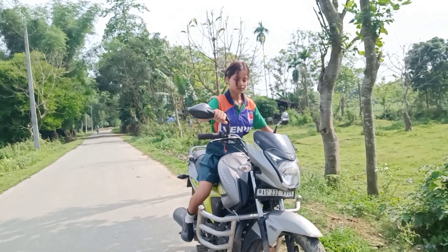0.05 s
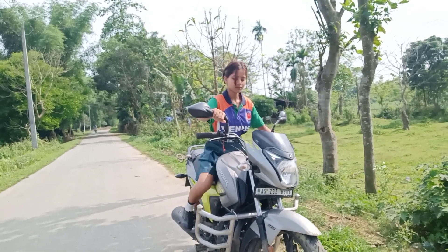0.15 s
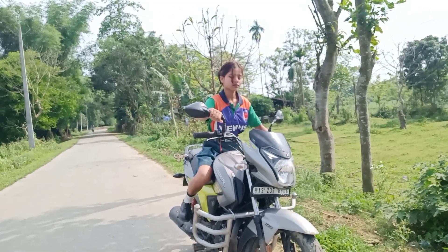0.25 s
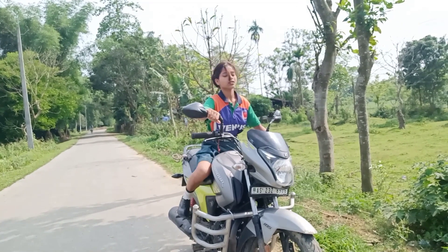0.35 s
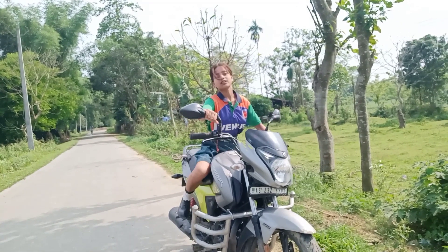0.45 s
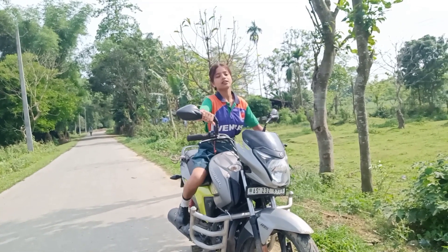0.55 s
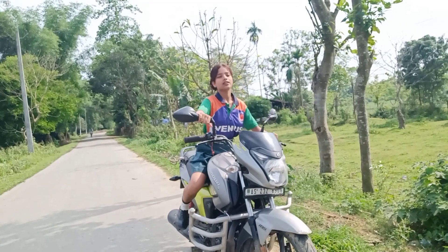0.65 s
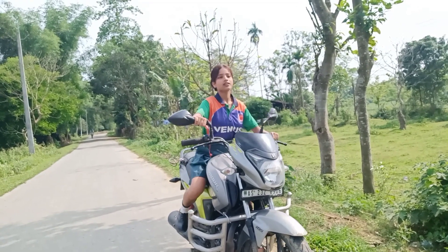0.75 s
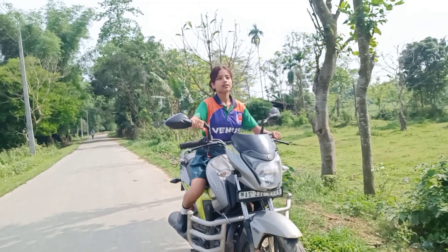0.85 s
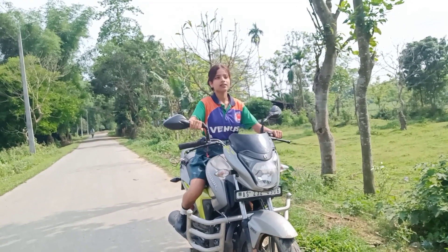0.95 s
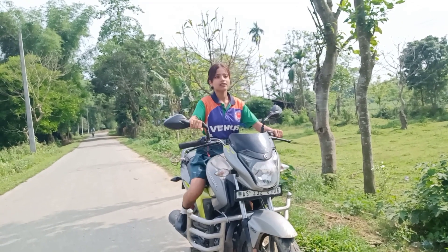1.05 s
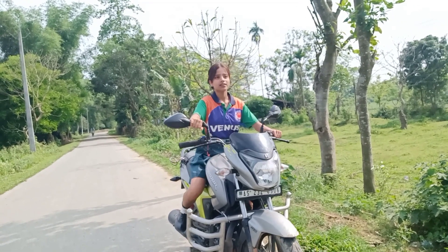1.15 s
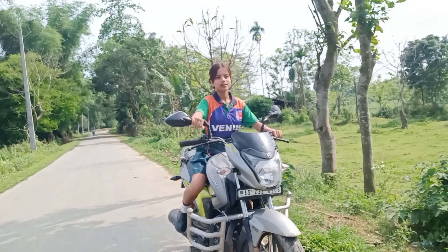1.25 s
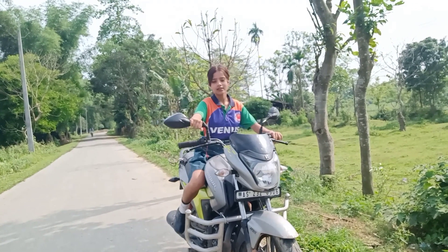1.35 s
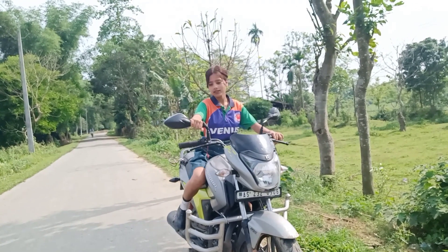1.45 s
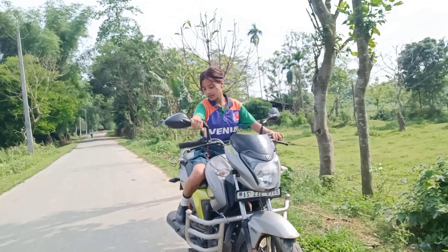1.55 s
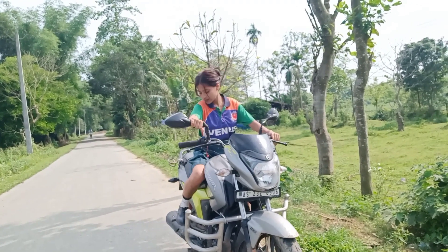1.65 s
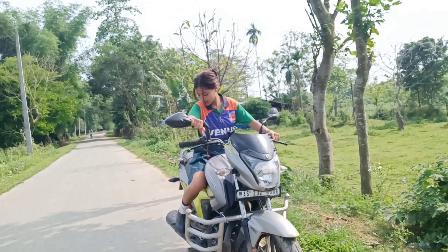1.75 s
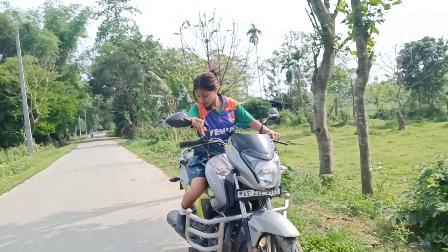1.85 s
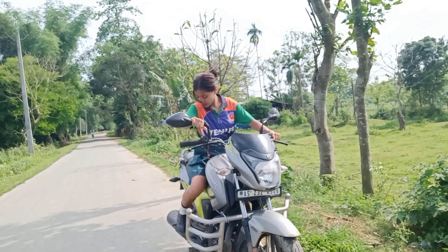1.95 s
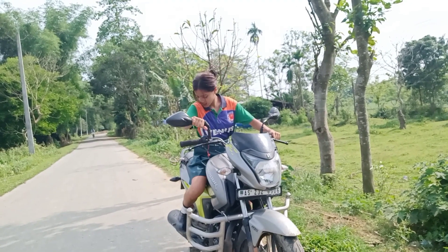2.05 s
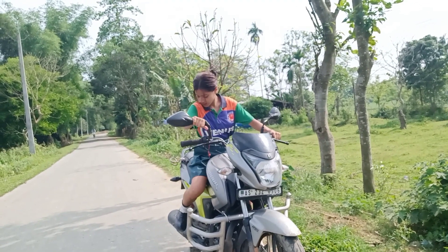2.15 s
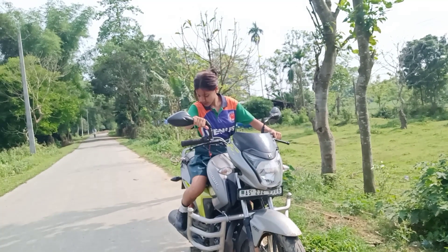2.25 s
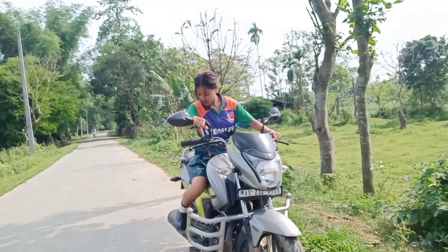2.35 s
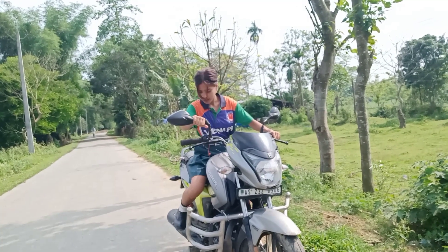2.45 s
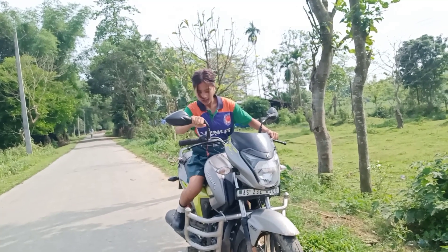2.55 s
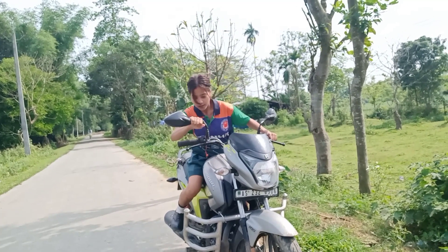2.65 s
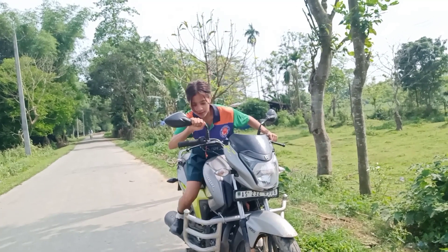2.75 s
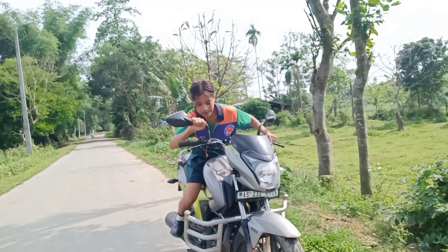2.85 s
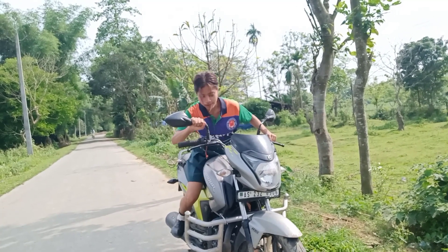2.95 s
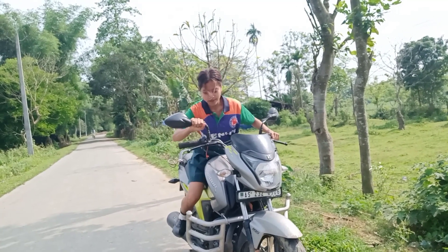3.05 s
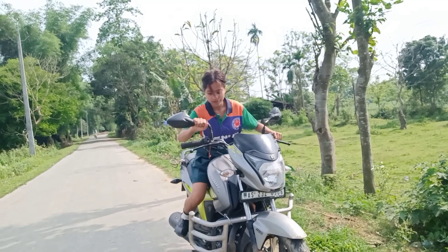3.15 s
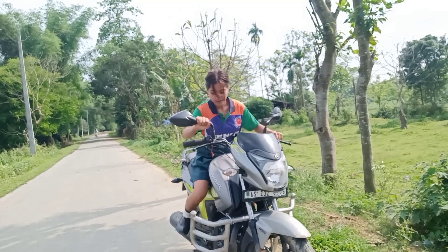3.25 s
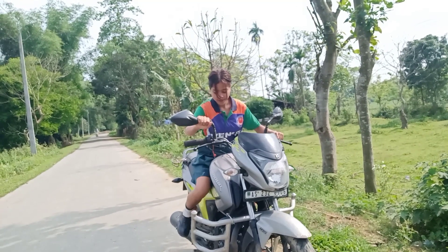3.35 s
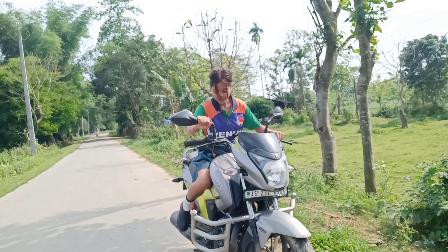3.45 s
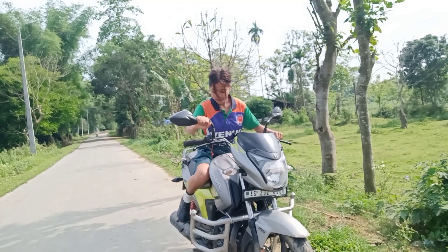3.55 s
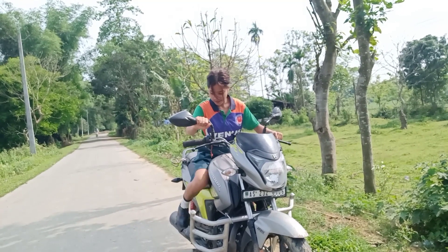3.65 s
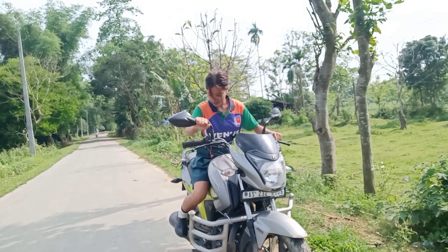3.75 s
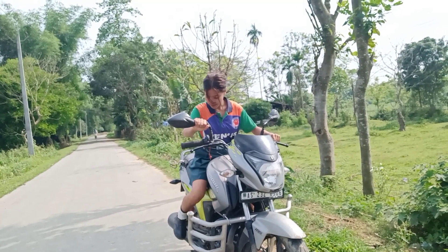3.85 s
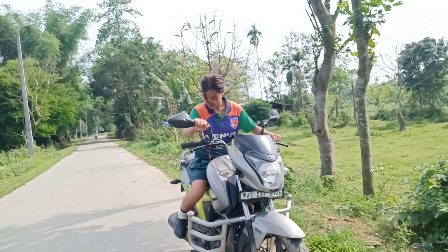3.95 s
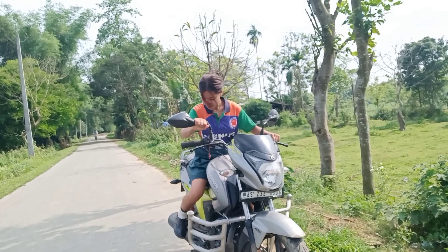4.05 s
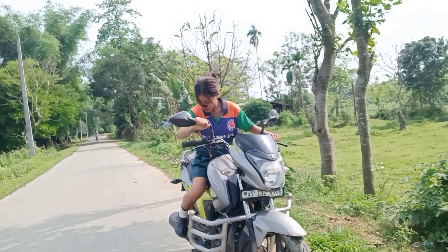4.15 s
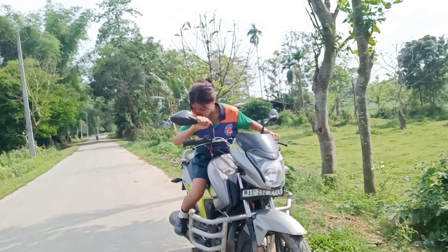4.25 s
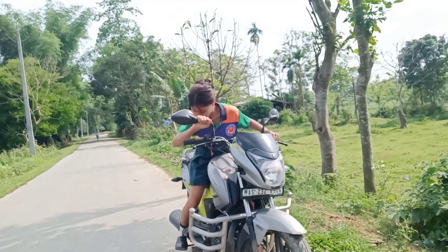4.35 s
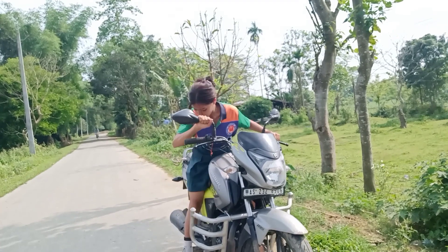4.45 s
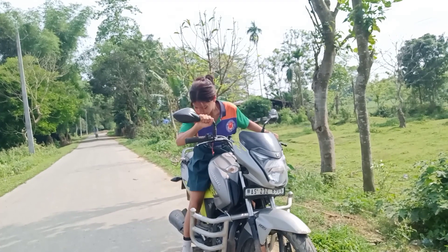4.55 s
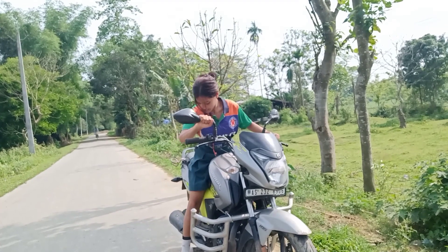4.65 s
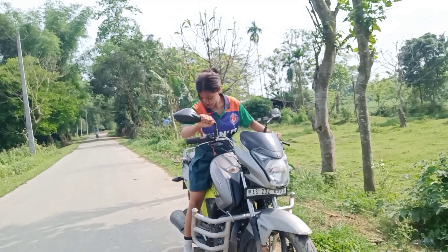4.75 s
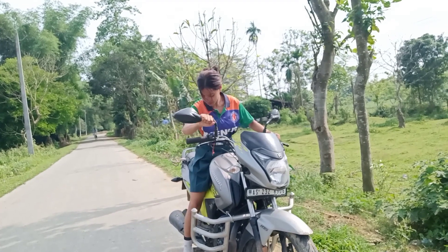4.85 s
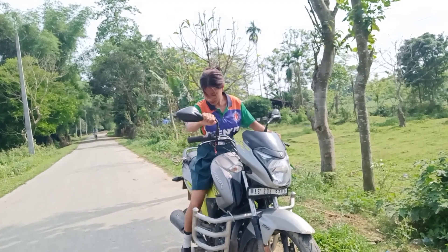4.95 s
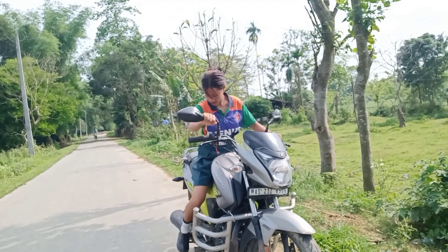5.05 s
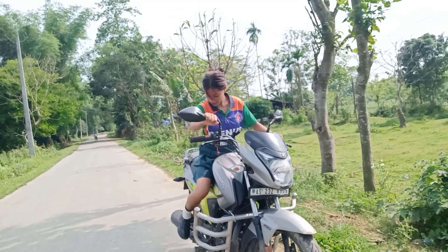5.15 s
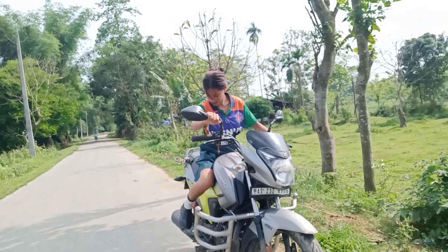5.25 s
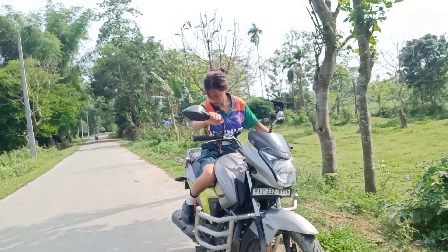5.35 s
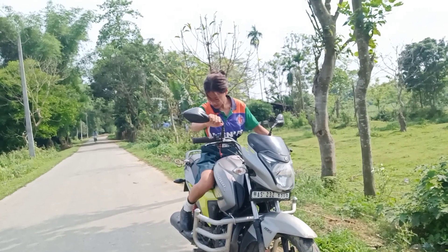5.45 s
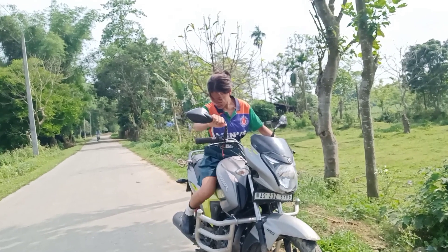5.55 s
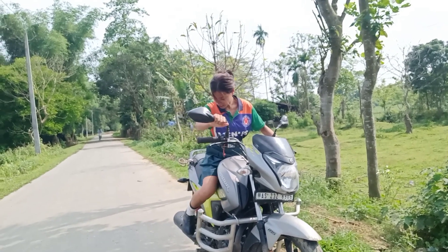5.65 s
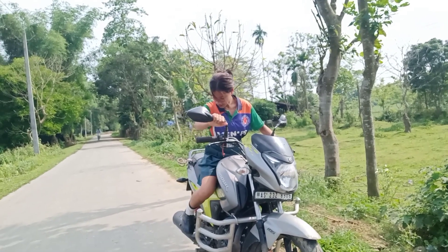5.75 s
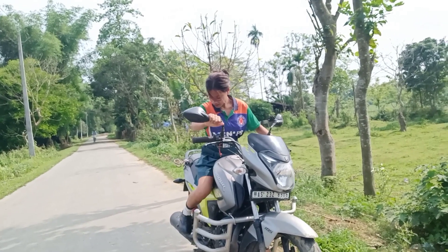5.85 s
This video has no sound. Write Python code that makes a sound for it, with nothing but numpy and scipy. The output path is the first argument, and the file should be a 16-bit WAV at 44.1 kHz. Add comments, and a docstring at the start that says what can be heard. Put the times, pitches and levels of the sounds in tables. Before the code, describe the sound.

On a quiet country road a motorcycle kick lever clicks and knocks, then one full kick rattles the gears without firing, amid cicadas and a whistling bird.

```python
"""On a country road a motorcycle's kick lever is nudged: ratchet teeth snap, a shoe scuffs, links knock.
In the first four seconds a bird repeats a falling whistle, another answers faintly; then gears groan.
Then one full kick: gears rattle, teeth snap in a row and the crank coasts in soft puffs, without firing.
Cicadas pulse throughout over a drone that grows near the end. Strikes, rattles and insects are shaped
noise; the lever's ring, the groan and the whistles are sines. Two microphones on a phone listen."""
import sys
import numpy as np
from scipy import signal
from scipy.fft import rfft, irfft, next_fast_len
from scipy.io import wavfile
from scipy.ndimage import uniform_filter1d

SR = 44100
rng = np.random.default_rng(int(sys.argv[2]) if len(sys.argv) > 2 else 0)


def bounce(signal):
    """Save signal as a 16-bit WAV file at the path given by the first command-line argument."""
    frames = np.transpose(np.atleast_2d(signal))
    limited = np.clip(frames, -1, 1)
    pcm = np.round(limited * 32767).astype(np.int16)
    wavfile.write(sys.argv[1], SR, pcm)


N = 259749
T = np.arange(N) / SR  # time of every sample [s]

# crankcase resonances: (pitch [Hz], width before sharpening [Hz], strength before scaling [dB])
CASE = [(1110, 60, -11), (1280, 24, 2), (1480, 79, -28), (1790, 28, -30), (2207, 18, -13), (2557, 40, -27),
        (2800, 69, -5), (2970, 118, -5.5), (3070, 8.1, 6), (3219, 51, -28), (3400, 48, -16), (3790, 70, 4)]
# pushes that turn the gears, the loudest being the full kick:
# (start [s], rise [s], length [s], level before friction [dB])
PUSHES = [(2.787, 0.054, 0.097, -48.5), (2.934, 0.12, 0.19, -52), (3.213, 0.1, 0.18, -56),
          (3.68, 0.039, 0.11, -57), (3.846, 0.022, 0.06, -55), (4.298, 0.13, 0.43, -34),
          (4.808, 0.14, 0.54, -47), (5.52, 0.055, 0.09, -49.5)]
# a clear tone goes only into the row that reaches both microphones: (share of the tone [0-1])
SHARED = np.array([[1], [0]])


def undb(db):
    """Turn decibels into gain."""
    return 10 ** (np.asarray(db) / 20)


def unit(x):
    """Scale to an average (rms) strength of 1."""
    return x / np.sqrt(np.mean(x ** 2))


def along(points, hz):
    """Read (Hz, value) points along a logarithmic pitch axis."""
    f, value = np.transpose(points)
    return np.interp(np.log(hz + 1), np.log(f), value)


def curve(rows, column=1):
    """Join the points of a table column by straight lines, at every sample."""
    rows = np.array(rows)
    return np.interp(T, rows[:, 0], rows[:, column])


def gesture(rows, fade=0.035):
    """Gain of a (time [s], level [dB]) curve that fades out beyond its ends."""
    first, last = rows[0][0], rows[-1][0]
    ends = np.interp(T, [first - fade, first, last, last + fade], [0, 1, 1, 0])
    return undb(curve(rows)) * ends


def colour(x, db_of):
    """Filter to the gain db_of(Hz) with no sound ahead of its cause (minimum phase)."""
    size = next_fast_len(x.shape[-1] + 4096, True) // 2 * 2
    hz = np.arange(size // 2 + 1) * SR / size
    cepstrum = irfft(np.log(undb(db_of(hz))))
    # folding the second half onto the first puts the response after its cause
    cepstrum[1:size // 2] *= 2
    cepstrum[size // 2 + 1:] = 0
    return irfft(rfft(x, size) * np.exp(rfft(cepstrum)))[..., :x.shape[-1]]


def resonances(modes, hz, lift_db, sharpen):
    """Gain in dB where a body rings along; a higher sharpen makes the peaks narrower."""
    peaks = 0
    for f, width, db in modes:
        peaks = peaks + undb(db / 4) / (1 + (2 * sharpen * (hz - f) / width) ** 2)
    return lift_db * peaks


def walk(rate):
    """Random wander with a spread near 1, taking a new value `rate` times a second."""
    count = int(N / SR * rate) + 2
    points = rng.standard_normal(count)
    return np.sqrt(3 / 2) * np.interp(T * rate, np.arange(count), points)


def hiss(spectrum):
    """Two separate rows of coloured noise."""
    return unit(colour(rng.standard_normal((2, N)), lambda hz: along(spectrum, hz)))


def grains(rate, scatter_db):
    """Dense tiny impacts of uneven size, at random moments."""
    hits = (rng.random(N) < rate / SR) * undb(scatter_db * rng.standard_normal(N))
    return hits * rng.standard_normal((2, N))


def add(out, sound, s):
    """Mix a sound in at time s [s], cutting what falls outside."""
    start = int(s * SR)
    first, last = max(start, 0), min(start + sound.shape[-1], N)
    out[:, first:last] += sound[:, first - start:last - start]


def blow(body, db_of, slide_db, slide_s, rise_s, crack_s, ring_db, ring_t60, repeat):
    """Metal slides, then strikes: a crack and a dense ring, partly the same each time."""
    t = (np.arange(body.shape[1]) - body.shape[1] // 10) / SR  # the strike is a tenth of the way in
    after = np.maximum(t, 0)
    decay = np.exp(-after / crack_s) + undb(ring_db - 60 * after / ring_t60)
    strike = np.clip(t / rise_s, 0, 1) * decay
    slide = undb(slide_db) * (t > -slide_s) * (t < rise_s)
    repeat = np.clip(repeat, 0, 1)
    ring = np.sqrt(repeat) * body + np.sqrt(1 - repeat) * rng.standard_normal(body.shape)
    sound = colour(ring * (strike + slide), db_of)
    return sound / np.sqrt(np.sum(sound ** 2) / (SR / 100))  # the same energy for every blow


def strokes(rows, drag_db_per_s, release_s):
    """Strokes that gather speed, are slowed by friction and die away after their length."""
    gain = np.zeros(N)
    for s, rise_s, length_s, db in rows:
        t = T - s
        attack = np.clip(t / rise_s, 0, 1) ** 2
        release = np.exp(-np.maximum(t - length_s, 0) / release_s)
        gain += attack * release * undb(db - drag_db_per_s * np.maximum(t - rise_s, 0))
    return gain


def ratchet(body):
    """Each tooth rides up its ramp and snaps down, ringing the crankcase."""
    # teeth snapping over: (time [s], level [dB], treble [dB], bass [dB])
    teeth = [(0.1221, -23, -6, -4.5), (0.2136, -22, -11, -2), (0.3327, -26, -8, 2.5),
             (4.5107, -25, -3.5, 7), (4.553, -24.5, -5.5, 1.5), (4.5968, -23, -1.5, 5),
             (4.649, -24.5, -2.5, 0), (4.704, -21, -3, -2), (4.878, -27.5, -2.5, 3),
             (5.0273, -24.5, -3, 2.5), (5.1021, -24, -2.5, 0), (5.1686, -24, -2, 0), (5.24, -24, -4, 1.5),
             (5.327, -24.5, -2, 0)]
    # broad colour of a snap: (pitch [Hz], level [dB])
    snap_colour = [(100, -39), (280, -22), (430, -5.5), (900, -14.5), (1400, -4.5), (2200, 3), (3100, -1.5),
                   (4200, -2), (5200, -0.5), (6200, 6), (7000, -6), (8200, -21), (10000, -25), (15000, -27)]
    out = np.zeros((2, N))
    for s, db, treble_db, bass_db in teeth:
        tilt = [(800, bass_db), (1700, 0), (3200, 0), (5000, treble_db)]

        def tone(hz):
            return along(snap_colour, hz) + along(tilt, hz) + resonances(CASE, hz, lift_db=7.5, sharpen=1)

        snap = blow(body, tone, slide_db=-16.5, slide_s=0.0075, rise_s=0.0021, crack_s=0.006,
                    ring_db=-11.5, ring_t60=0.18, repeat=0.31)
        add(out, snap * undb(db), s - body.shape[1] / 10 / SR)
    return out


def gears():
    """Gear teeth and chain rattle the gearbox in uneven bursts while the lever drives the crank."""
    # broad colour of the churning: (pitch [Hz], level [dB])
    churn_colour = [(60, -18), (140, -7), (330, -11), (420, -6), (560, 0.5), (850, 2), (1150, 1.5),
                    (1650, -6), (2400, -2), (3200, -12), (4500, -15), (7000, -30), (10000, -37.5)]
    # gearbox resonances: (pitch [Hz], width before sharpening [Hz], strength before scaling [dB])
    gearbox = [(239.5, 75, 8.5), (434, 170, 29.5), (438, 48, -34), (678, 40, 13), (797.6, 26, 22.5),
               (781, 11, -5), (1004, 24, -2), (1250, 47, -36), (1290, 14, 9), (1460, 20, -28),
               (1824, 17, 45), (2250, 49, 20)]
    rattle = unit(grains(rate=2000, scatter_db=1.5)) + 1.12 * rng.standard_normal((2, N))
    bursts = undb(2.6 * walk(110))

    def tone(hz):
        return along(churn_colour, hz) + resonances(gearbox, hz, lift_db=6.0, sharpen=2.03)

    churn = unit(colour(rattle * bursts, tone))
    return churn * strokes(PUSHES, drag_db_per_s=33, release_s=0.063)


def puffs(width_s=0.03):
    """Soft low puffs: one for every turn of the coasting crank, and a few more at uneven times."""
    # colour of a puff: (pitch [Hz], level [dB])
    puff_colour = [(25, -17), (45, -17), (68, 0), (100, -1), (135, -11.5), (200, -15.5), (400, -52.5)]
    # further low puffs of air: (time [s], level [dB])
    further_puffs = [(1.93, -65), (3.32, -59.5), (3.722, -58), (4.261, -61.5), (4.868, -52), (5.61, -58)]
    spin_start_s, turn_s, turn_count = 4.457, 0.0812, 12
    turn_slowing = 0.0081  # each turn takes longer by this share of the first
    first_puff_db, hold_s, fade_db_per_s = -52, 0.39, 19  # puffs fade once the crank has lost its swing
    turn = np.arange(turn_count)
    since = turn_s * turn * (1 + turn_slowing * turn / 2)
    levels = first_puff_db - fade_db_per_s * np.maximum(since - hold_s, 0)
    gain = np.zeros(N)
    for s, db in [*zip(spin_start_s + since, levels), *further_puffs]:
        gain += undb(db) * np.exp(-((T - s) / width_s) ** 2)
    return hiss(puff_colour) * gain


def whine():
    """Slowly meshing gears groan on one unsteady note, their teeth smearing it."""
    # the groan as the engine is eased over: (time [s], pitch [Hz], level [dB])
    groan = [(2.87, 468, -72), (2.9, 482, -56), (2.96, 508, -70), (3.03, 539, -58), (3.12, 542, -57.5),
             (3.25, 545.6, -56), (3.34, 626, -60.5), (3.39, 575, -73)]
    # overtones of the note: (multiple of the pitch [1], level [dB])
    mesh = [(1, 2), (2, -10), (4, -13)]
    phase = 2 * np.pi * np.cumsum(curve(groan)) / SR
    note = 0
    for k, db in mesh:
        smear = 1 + .5 * (walk(150) + 1j * walk(150))  # wanders in loudness and phase
        note = note + undb(db) * np.imag(smear * np.exp(1j * k * phase))
    return SHARED * note * gesture([(s, db) for s, _, db in groan])


def ticks():
    """The loose linkage ticks faintly at random moments of each push; rows like those of the knocks."""
    per_s, level_db, scatter_db, bass_db, contact_s = 9, -50, 4.5, -15, 0.0093
    rows = []
    for s, _, length_s, _ in PUSHES:
        for place, size in rng.uniform(0, 1, (8, 2))[:round(per_s * length_s)]:
            db = level_db + scatter_db * (2 * size - 1)
            rows.append((s + place * length_s, db, bass_db, contact_s))
    return rows


def linkage(body, corner_hz=3000, slope_db=14):
    """Duller knocks into the same case; a longer contact rises more slowly and loses treble."""
    # slack in the lever and gears knocking home: (time [s], level [dB], bass [dB], contact time [s])
    knocks = [(0.036, -34.5, -29, 0.0064), (0.611, -36.5, -15, 0.013), (0.67, -42.5, -14, 0.0056),
              (1.29, -47.5, 2.5, 0.024), (1.403, -46, -14, 0.005), (1.84, -37, 10, 0.0068),
              (1.967, -33, 6.5, 0.0068), (2.795, -44, -8, 0.007), (2.871, -36.5, 1, 0.001),
              (3.037, -31, 1.5, 0.0077), (3.209, -42.5, 34, 0.0036), (3.486, -42.5, -8, 0.0043),
              (3.663, -41, -15, 0.0036), (3.755, -35.5, -12, 0.0098), (3.798, -36, -24, 0.004),
              (3.813, -35, 12.5, 0.0016), (3.859, -38.5, 3.5, 0.0026), (3.91, -36, 0.5, 0.003),
              (4.161, -46, 2, 0.0079), (4.32, -43.5, -5, 0.0045), (4.461, -28, 10, 0.004),
              (4.9463, -20, -5.5, 0.0094), (5.565, -36.5, -20, 0.014)]
    # broad colour of a knock: (pitch [Hz], level [dB])
    knock_colour = [(120, -32), (300, -11), (480, -2.5), (1000, -2), (1400, -1.5), (2200, 3.5),
                    (2900, -8.5), (3500, -7), (4500, -4), (6500, -1.5), (9000, -37), (15000, -34)]
    out = np.zeros((2, N))
    for s, db, bass_db, contact_s in knocks + ticks():
        tilt = [(700, bass_db), (1800, 0.004)]

        def tone(hz):
            # the treble slopes down per octave above the corner, for more octaves after a longer contact
            octaves = np.clip(np.log2((hz + 1) / corner_hz), 0, contact_s / 0.014)
            case = resonances(CASE, hz, lift_db=8.0, sharpen=0.49)
            return along(knock_colour, hz) + along(tilt, hz) - slope_db * octaves + case

        knock = blow(body, tone, slide_db=-1.0, slide_s=0.0049, rise_s=contact_s, crack_s=0.016,
                     ring_db=-0.5, ring_t60=0.15, repeat=0.28)
        add(out, knock * undb(db), s - body.shape[1] / 10 / SR)
    return out


def lever():
    """The steel lever rings in several pitches at once, chattering on its loose pivot."""
    # the lever meets its stop: (time [s], level [dB])
    stops = [(1.97, -32.5), (2.872, -39), (3.826, -39.5)]
    # ways the lever rings: (pitch [Hz], level [dB], time to fall by 60 dB [s])
    modes = [(2392, -2, .16), (2416, -3, .18), (2520, -9, .13), (1610, -15, .16), (4700, -22, .12)]
    out, t = np.zeros((2, N)), np.arange(SR // 2) / SR
    for s, db in stops:
        ring = 0
        for hz, mode_db, t60 in modes:
            phase = rng.uniform(0, 2 * np.pi, (2, 1))
            ring = ring + undb(mode_db - 60 * t / t60) * np.sin(2 * np.pi * hz * t + phase)
        chatter = undb(3 * walk(220)[:len(t)])
        add(out, ring * chatter * undb(db), s)
    return out


def shoe():
    """The sole sticks and slips on the lever in lumpy steps."""
    # colour of the rubbing: (pitch [Hz], level [dB])
    sole = [(60, -29), (110, -9.5), (170, 7.5), (260, 3), (420, -2), (620, -5), (1100, 1), (2300, 1),
            (3800, -9), (6000, -21), (10000, -49)]
    # the shoe scuffs: (start [s], rise [s], length [s], level before friction [dB])
    scuffs = [(-0.02, 0.017, 0.12, -54.5), (0.37, 0.097, 0.27, -46.5), (0.755, 0.02, 0.025, -58.5),
              (1.83, 0.043, 0.05, -55), (1.865, 0.067, 0.37, -46.5), (5.56, 0.04, 0.084, -54)]
    rub = unit(colour(grains(rate=6000, scatter_db=1.5), lambda hz: along(sole, hz)))
    lumps = undb(2.8 * walk(60))
    return rub * lumps * strokes(scuffs, drag_db_per_s=47, release_s=0.072)


def birds(step_hz=38, step_depth=0.044, flutter_db=5, waver=0.016, patchy_db=3.0, echo_t60=0.44):
    """Whistles that fall in small wavering steps, with an echo from the trees made of fading noise."""
    # calls; the faint higher one is another bird, farther off:
    # (time [s], length [s], pitch ratio [1], level [dB], echo relative to the call [dB])
    calls = [(0.666, 0.205, 0.95, -49, -8.5), (1.19, 0.195, 0.97, -47, -7.5), (1.68, 0.16, 1.017, -46, -7),
             (2.197, 0.195, 1, -44, -9.5), (2.549, 0.25, 1.1, -71.5, 10.5), (3.392, 0.25, 0.94, -64.5, 4.5),
             (3.964, 0.13, 1, -60, -6)]
    # a quick dip from above and a straight fall, before each call's pitch ratio
    start_hz, end_hz, dip_hz, dip_s = 3340, 1676, 710, 0.013
    # it swells, holds for a share of its length, and trails off
    attack_s, hold_share, trail_db = 0.034, 0.61, -17.5
    direct, scattered = np.zeros((2, 1, N))
    for s, length, ratio, db, echo_db in calls:
        t = np.arange(int(length * SR)) / SR
        share = t / length
        fall = start_hz + (end_hz - start_hz) * share + dip_hz * np.exp(-t / dip_s)
        trail = undb(np.interp(share, [hold_share, 1], [0, trail_db]))
        envelope = np.minimum(t / attack_s, 1) * trail
        # within a step the fall is held back, then the pitch drops; each step starts a little louder
        stair = uniform_filter1d((t * step_hz + rng.random()) % 1 - .5, size=130)
        wobble, patches = walk(260)[:len(t)], walk(110)[:len(t)]
        hz = ratio * fall * (1 + waver * wobble + step_depth * stair * (1 + 2 * share))
        gain = envelope * undb(db - flutter_db * stair + patchy_db * patches)
        gain = gain * signal.windows.tukey(len(t), .1)
        call = (gain * np.sin(2 * np.pi * np.cumsum(hz) / SR))[None]
        add(direct, call, s)
        add(scattered, call * undb(echo_db), s)
    t = np.arange(SR // 2) / SR
    trees = rng.standard_normal((2, len(t))) * undb(-60 * t / echo_t60)
    trees /= np.sqrt(np.sum(trees ** 2) / 2)
    return SHARED * direct + signal.fftconvolve(scattered, trees)[:, :N]


def cicadas():
    """A chorus swells about twice a second over a steady drone; the tymbals make it flutter."""
    # colours of the swells and of the drone: (pitch [Hz], level [dB])
    song_colour = [(3400, -43), (4000, -16.5), (4500, -6.5), (5200, -5.5), (5800, 0), (6300, -1.5),
                   (6800, -7.5), (7500, -18.5), (9000, -25.5), (10500, -43), (12500, -30), (15000, -27.5)]
    drone_colour = [(3500, -41), (4500, -11.5), (5500, -8), (6000, -1.5), (6400, 0), (6900, -11.5),
                    (7600, -19.5), (9000, -26), (10500, -43.5), (15000, -31)]
    # the drone takes over late: (time [s], swell level [dB], drone level [dB])
    chorus = [(0, -47, -55), (1.2, -47.5, -54.5), (3.6, -46, -54.5), (4.3, -50, -49.5), (5.0, -67, -49.5),
              (5.5, -53, -49.5), (5.89, -58, -48.5)]
    first_s, period_s = -0.068, 0.458
    attack_s, hold_s, release_db_per_s = 0.046, 0.17, 58  # hold counts from the start of the swell

    def swell(t):
        return np.minimum(t / attack_s, 1) * undb(-release_db_per_s * np.maximum(t - hold_s, 0))

    age = (T - first_s) % period_s
    swells = np.hypot(swell(age), swell(age + period_s))  # each overlaps the tail of the one before
    song = hiss(song_colour) * swells * undb(curve(chorus) + 0.19 * walk(160))
    drone = hiss(drone_colour) * undb(curve(chorus, column=2) + 1.4 * walk(73))
    return song + drone


def air():
    """Air and distant bird chatter: coloured noise whose level wanders slowly."""
    # colour of this background: (pitch [Hz], level [dB])
    air_colour = [(20, -69), (40, -6.5), (70, -2.5), (130, 0), (250, -6.5), (450, -8), (900, -8),
                  (1500, -6), (2400, 0.5), (3400, -5), (5200, -4.5), (8800, -81)]
    wander = undb(1.5 * walk(6))
    return hiss(air_colour) * wander * undb(-61.0)


def microphones(pair, pan):
    """Row 0 reaches both microphones, row 1 only the left; level, delay and likeness vary with pitch."""
    # how alike the two microphones hear: (pitch [Hz], likeness [0-1])
    likeness = [(60, .15), (140, .75), (280, .97), (700, .94), (1300, .78), (2500, .72), (6000, .42),
                (10000, .1)]
    # how far the left one lags: (pitch [Hz], phase [radians])
    lag = [(60, 0.1), (250, 0.76), (550, 0.75), (1000, 1.22), (2200, 1.05), (6000, 1.15), (12000, 3.8)]
    size = next_fast_len(N, True)
    hz = np.arange(size // 2 + 1) * SR / size
    right, other = rfft(pair, size)
    alike = np.clip(along(likeness, hz), 0, 1)
    shade = undb(along(pan, hz))
    left = (alike * right + np.sqrt(1 - alike ** 2) * other) * shade * np.exp(-1j * along(lag, hz))
    balance = 2 / np.sqrt(1 + shade ** 2 + 2 * alike * shade)  # evens out the level, leaving the lag aside
    return irfft(np.array([left, right]) * balance, size)[:, :N]


def scene():
    """The bike close by, the countryside around it."""
    # left against right, for the bike and for the surroundings: (pitch [Hz], left minus right [dB])
    bike_pan = [(60, 2), (200, 0.6), (400, -.5), (700, -3), (1290, -9), (2400, -9.5), (4400, -9.5),
                (8000, -8.5), (15000, -18)]
    field_pan = [(100, -1.5), (600, 2.5), (1500, -6.5), (3000, -9.5), (5000, -6.5), (6500, -6), (9000, -5),
                 (14000, -17.5)]
    body = rng.standard_normal((2, SR // 4))  # the part of the ring that every blow has in common
    bike = ratchet(body) + gears() + puffs() + whine() + linkage(body) + lever() + shoe()
    field = birds() + cicadas() + air()
    return microphones(bike, bike_pan) + microphones(field, field_pan)


def record(dry):
    """The phone cuts the top: a steep filter removes what lies above 15750 Hz."""
    top_hz = 15750
    return signal.sosfilt(signal.ellip(10, .2, 70, top_hz, fs=SR, output="sos"), dry)


dry = scene()
out = record(dry)
bounce(out)
```